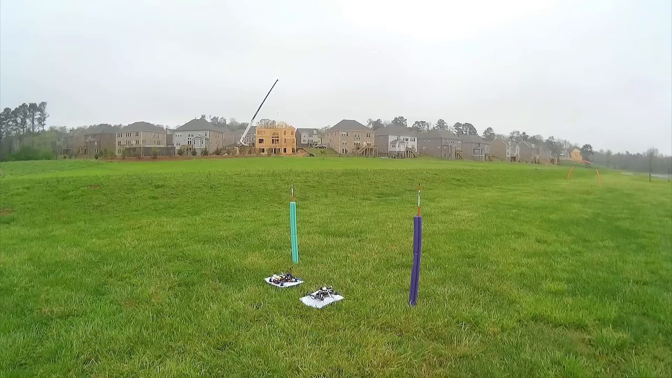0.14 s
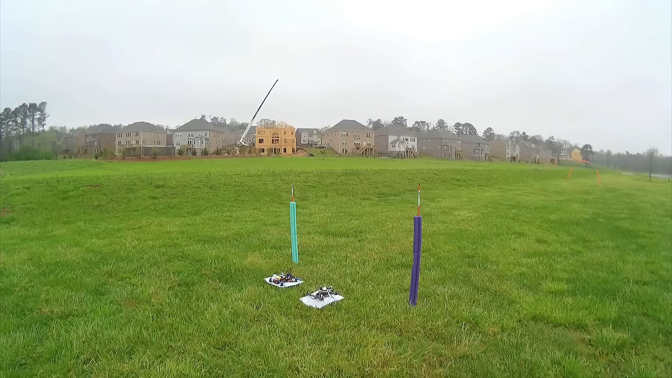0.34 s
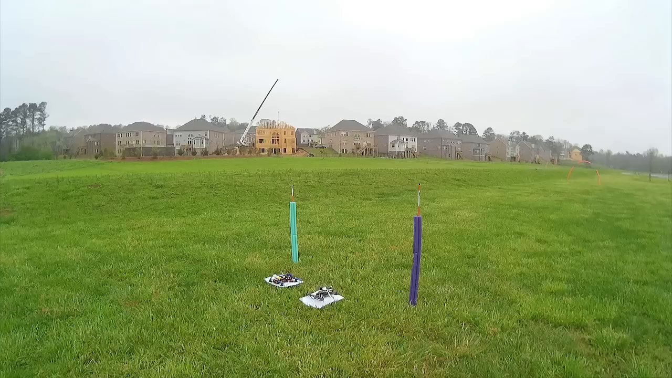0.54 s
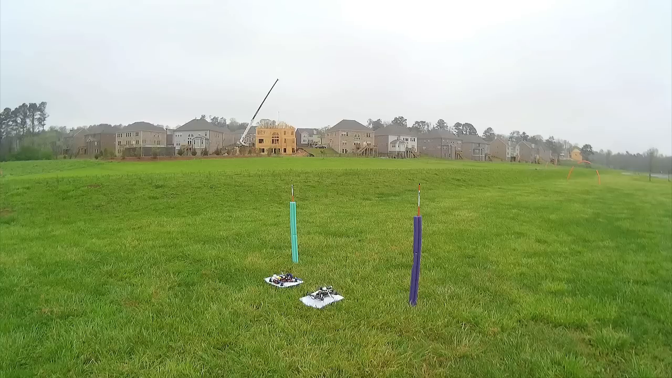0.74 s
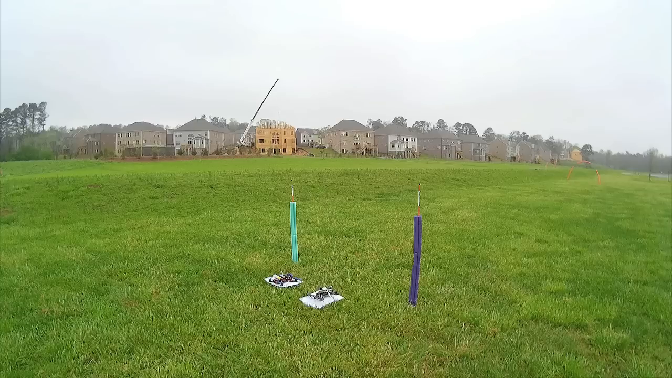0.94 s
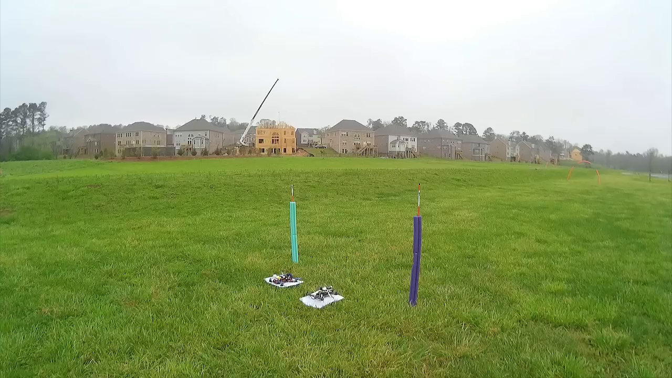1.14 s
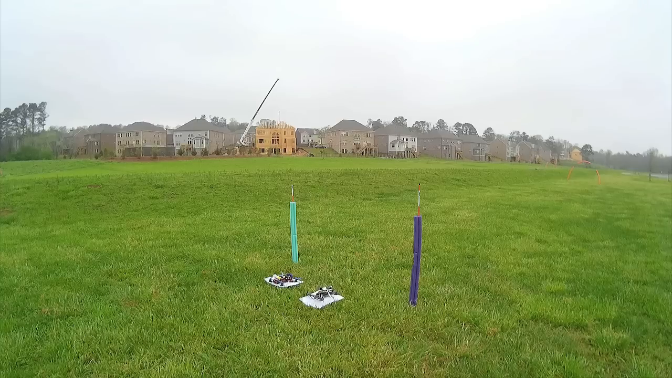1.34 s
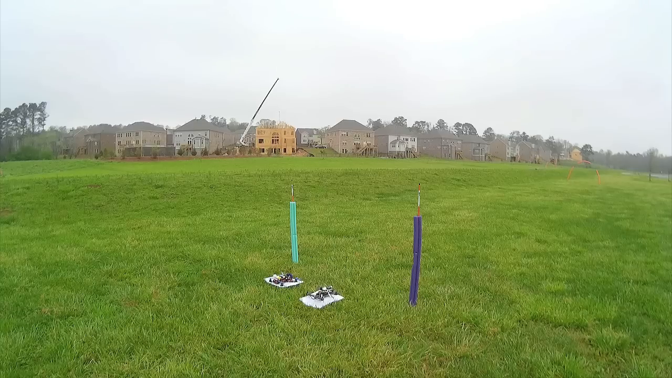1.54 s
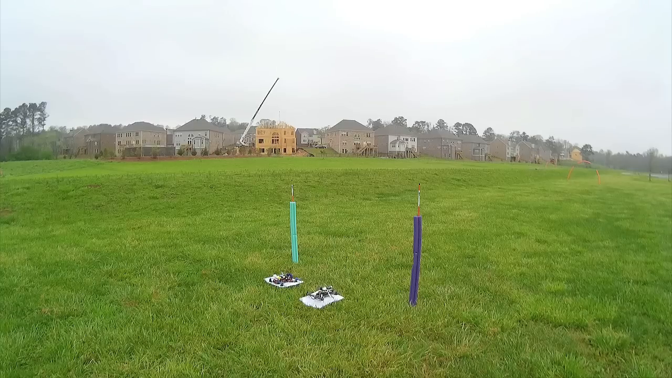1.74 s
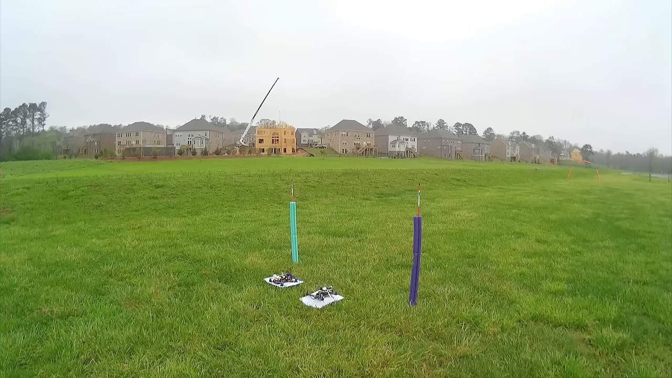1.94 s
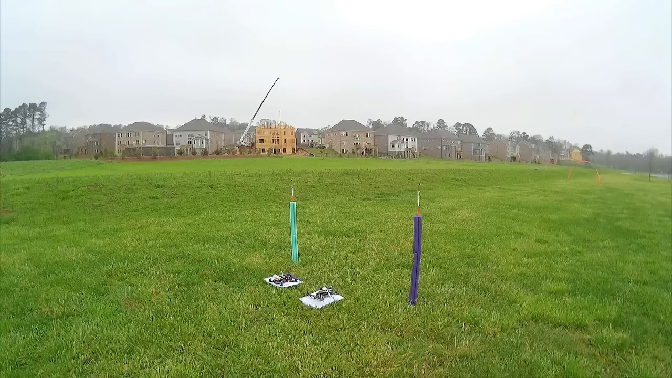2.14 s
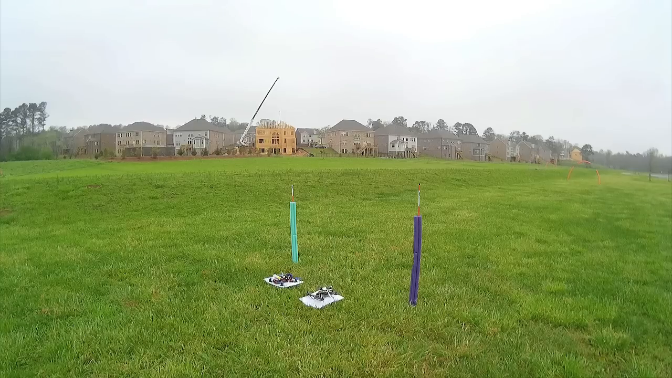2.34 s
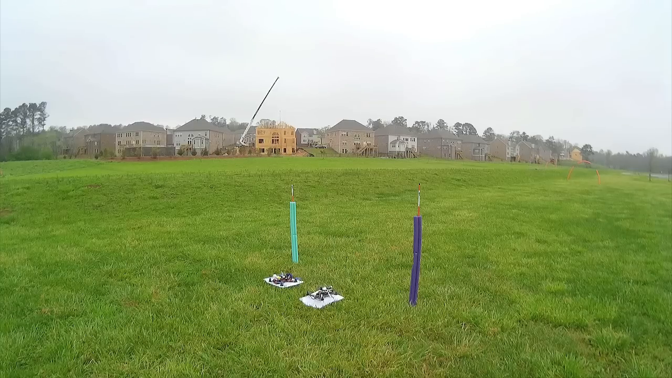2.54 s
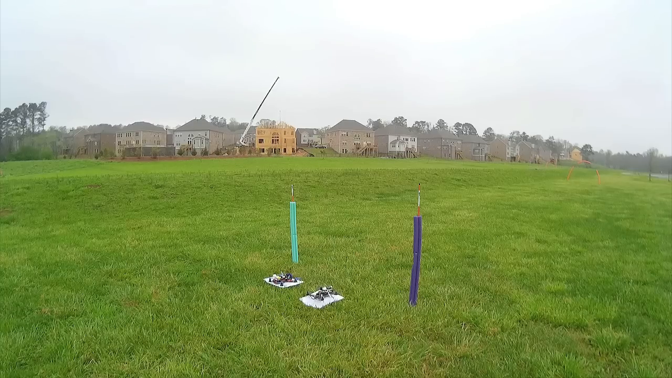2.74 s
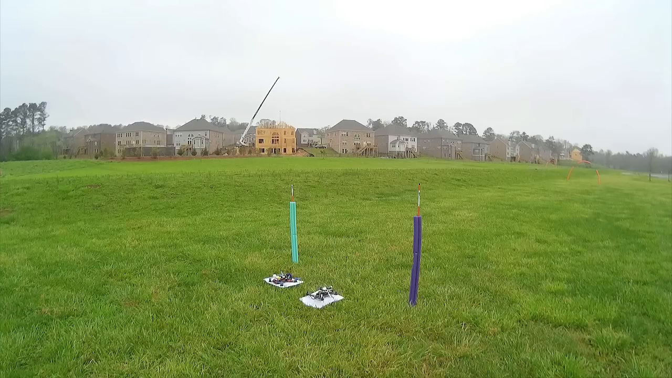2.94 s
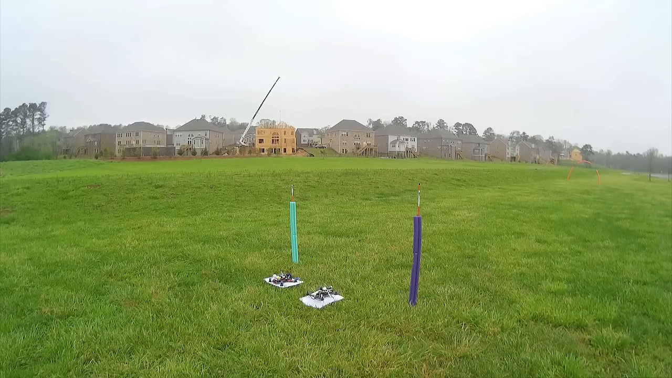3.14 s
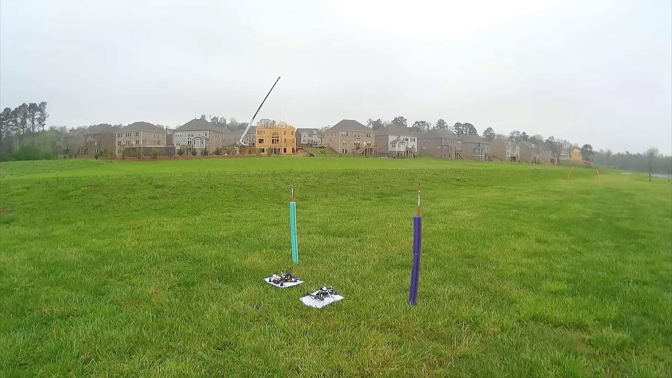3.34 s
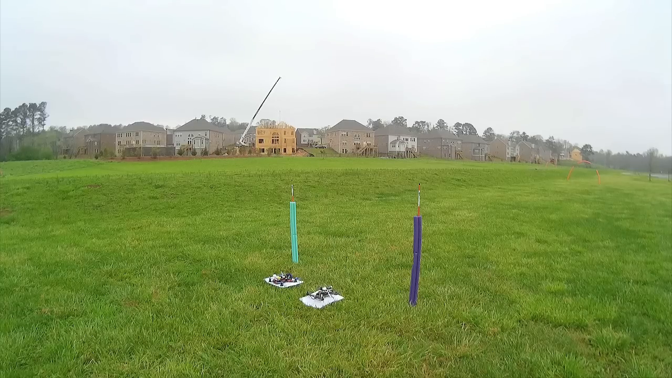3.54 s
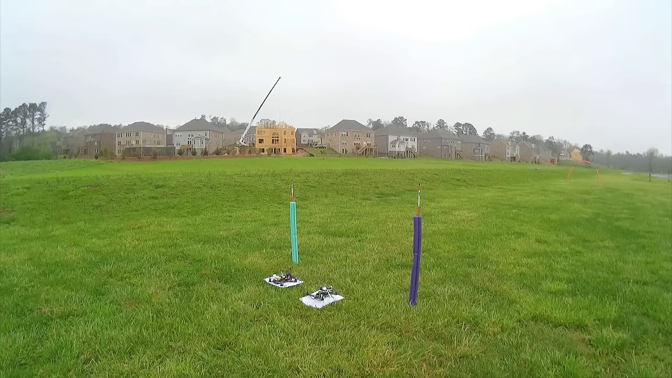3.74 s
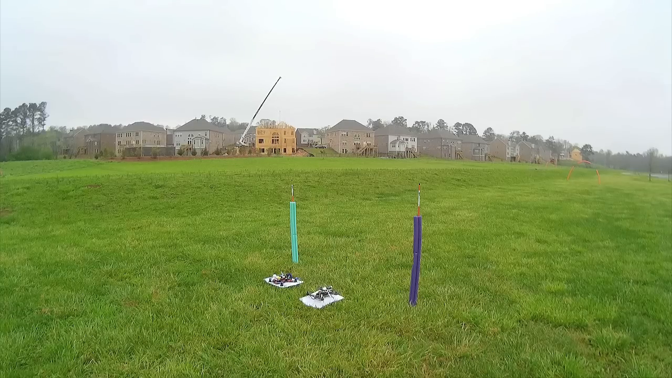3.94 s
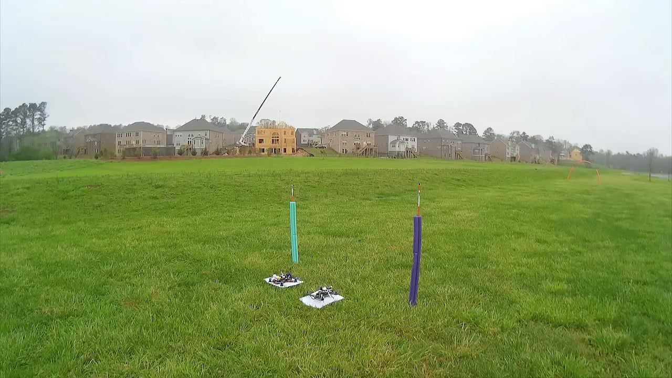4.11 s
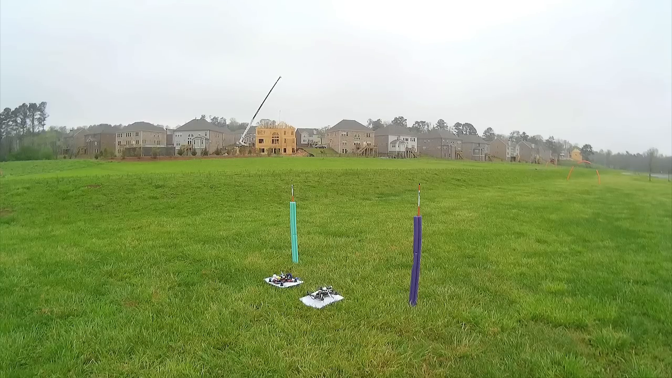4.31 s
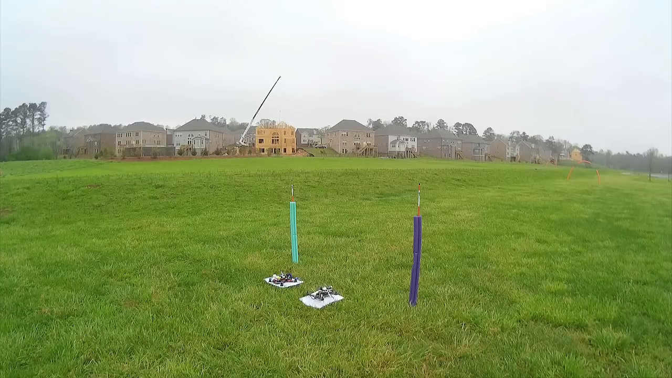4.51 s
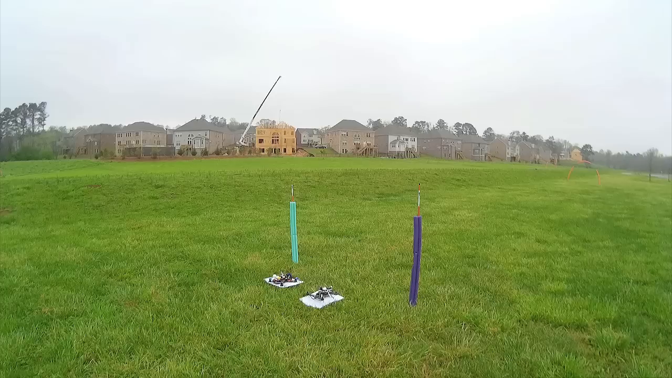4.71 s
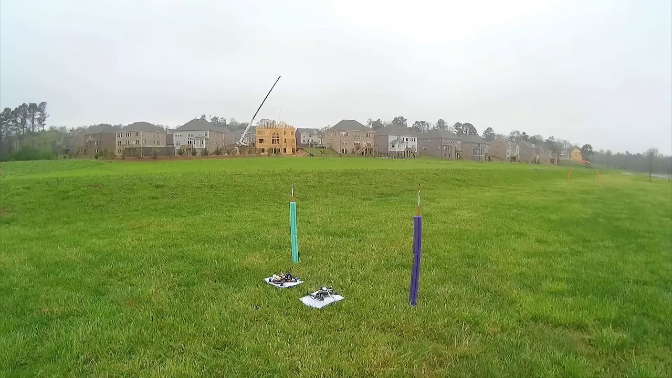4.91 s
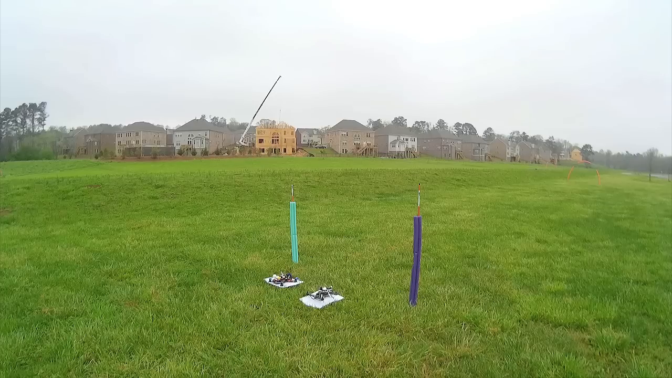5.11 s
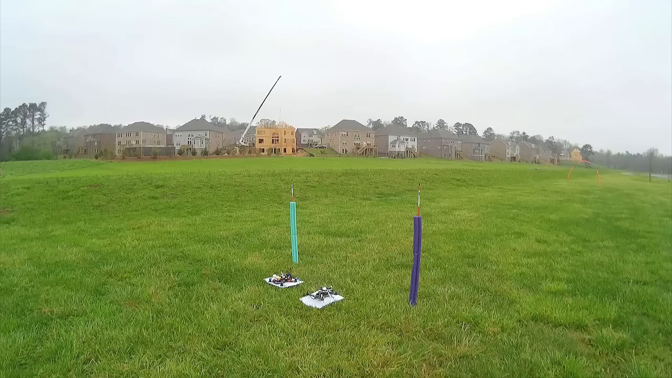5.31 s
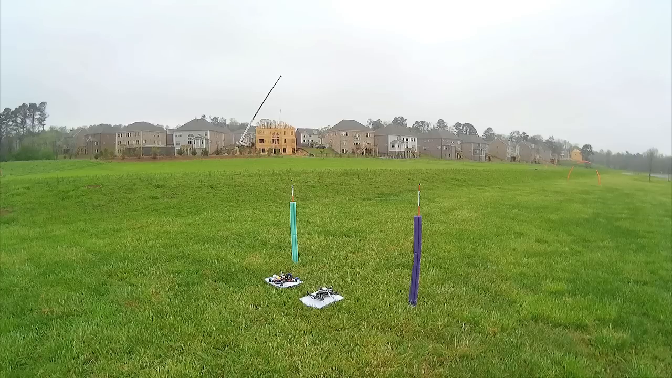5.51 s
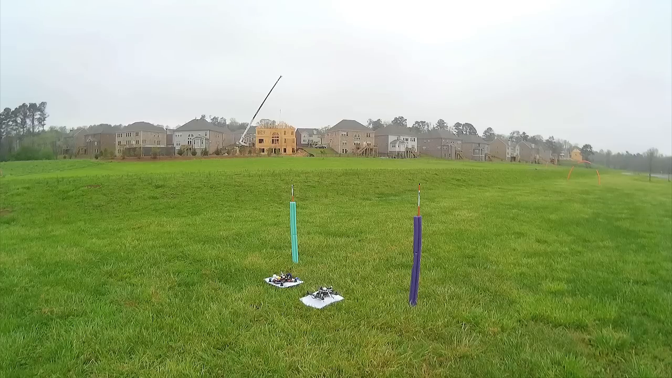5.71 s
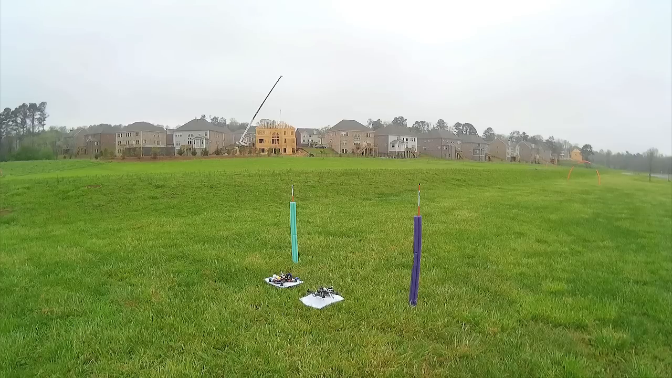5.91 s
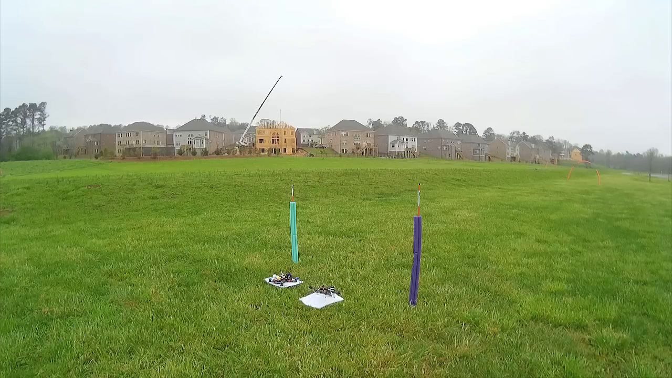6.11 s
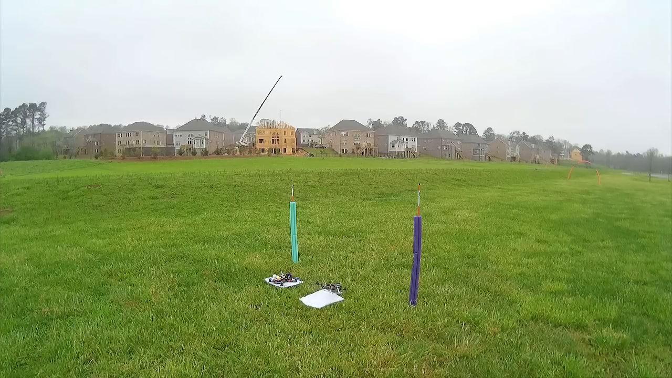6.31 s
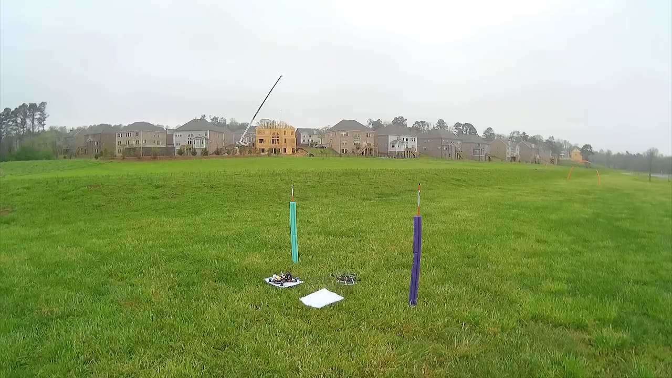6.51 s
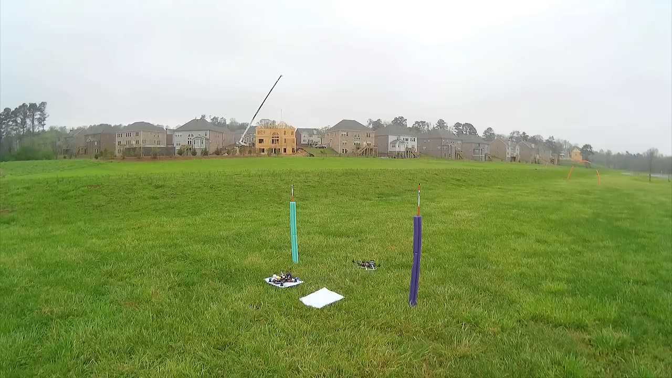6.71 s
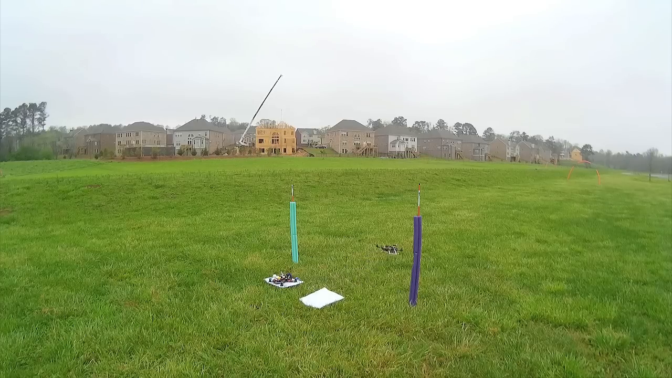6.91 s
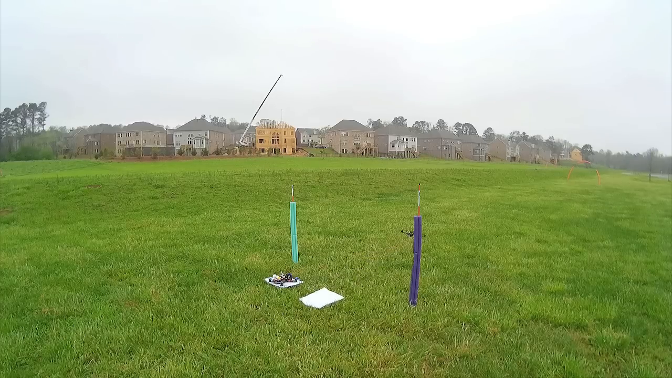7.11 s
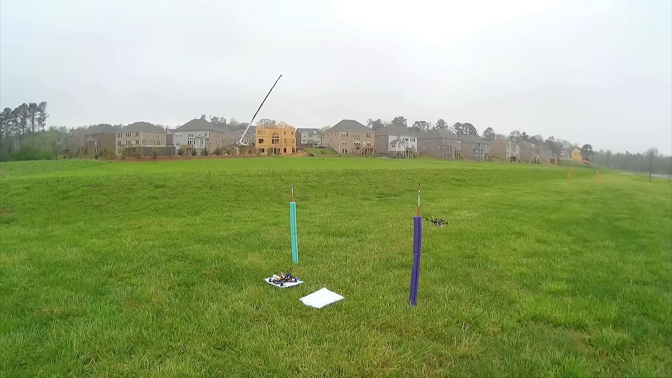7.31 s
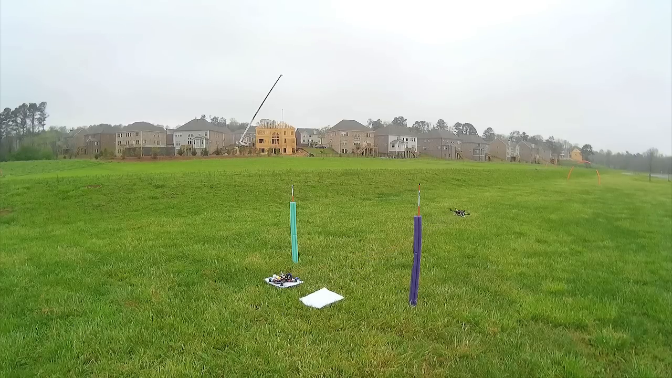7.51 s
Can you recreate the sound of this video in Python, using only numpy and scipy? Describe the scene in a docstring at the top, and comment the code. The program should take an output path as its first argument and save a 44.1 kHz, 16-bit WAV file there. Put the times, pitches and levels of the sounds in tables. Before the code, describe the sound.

Open grassy park, a fixed microphone a little way off. Two distant engines hum low and beat slowly over soft murmur. A plastic tick comes early, then thin motor-controller buzzes and a short duller quadcopter rev. Small bird chirps repeat evenly. Finally a racing drone spins up sharply, roars in rough surges with a high whine, lifts off its pad and gets thinner as it flies away.

```python
"""Two distant engines hum and beat over the murmur of a park, with a faint whistle from camera electronics;
all are tone stacks or shaped noise, and this background swells and sinks slowly. A plastic tick rings early on.
Motor controllers buzz as motors kick, then a small racing quadcopter revs briefly: blade tones and torn air.
A bird chirps, falling sine blips. Then a quadcopter spins up, magnets whining, lifts off its pad and flies away:
four rotors sing and roar with brief surges, and the echo off the ground fades out."""
import sys
import numpy as np
from scipy import signal
from scipy.fft import rfft, irfft, next_fast_len
from scipy.io import wavfile
from scipy.ndimage import uniform_filter1d

SR = 44100
rng = np.random.default_rng(int(sys.argv[2]) if len(sys.argv) > 2 else 0)


def bounce(signal):
    """Save signal as a 16-bit WAV file at the path given by the first command-line argument."""
    frames = np.transpose(np.atleast_2d(signal))
    limited = np.clip(frames, -1, 1)
    pcm = np.round(limited * 32767).astype(np.int16)
    wavfile.write(sys.argv[1], SR, pcm)


N = 332955
T = np.arange(N) / SR  # time in seconds

# Near engine speed before hunting. Each row: time in seconds, firing rate in Hz.
NEAR_SPEED = [(0, 76.7), (1.3, 76.4), (1.9, 76.2), (2.7, 78), (3.5, 78.3), (4.5, 78.05), (5.1, 77.93),
              (7, 77.45), (7.55, 77.3)]
# Near engine balance. Each row: time in seconds, fifth order in dB re hum, fan in dB re hum.
NEAR_BALANCE = [(0, -11.5, -20.5), (1.8, -8.5, -23), (2.6, -12, -15), (3.1, -20, -17.5), (4.5, -23.5, -16),
                (5.1, -13, -14), (5.7, -31, -18.5), (6.3, -11.5, -25), (7.55, -15, -19.5)]
# Near engine hum. Each row: multiple of the firing rate, level in dB re hum.
HUM_ORDERS = [(1, 0), (2, -7.5), (3, -22.5), (1.5, -23), (3.47, -21.5)]
# Near engine fan. Each row: multiple of the firing rate, level in dB re fan.
FAN_ORDERS = [(10, 1.5), (10.39, -1), (12.5, -4), (14, -5.5), (16.65, 3.5), (16.8, -2)]
# Far engine. Each row: time in seconds, firing rate in Hz, level in dB re hum, third order in dB re hum.
FAR_ENGINE = [(0, 73.5, -8.5, -26), (1.8, 73.4, -12.5, -12.5), (3.5, 74.06, -7, -30),
              (4.8, 74.33, -4.5, -26), (5.2, 74.4, -6, -14), (6, 74.43, -15.5, -13), (7, 74.75, -14.5, -13),
              (7.55, 74.9, -13, -17)]
# Far engine tones. Each row: multiple of the firing rate, level in dB re far engine.
FAR_ORDERS = [(1, -17), (2, 0.5)]
# Background level, which sets the hum and the field. Each row: time in seconds, level in dB.
BACKGROUND = [(0, -30), (.3, -35), (.9, -33.5), (1.75, -34.5), (2.1, -28), (2.4, -24), (2.9, -25.5),
              (3.6, -32), (3.9, -29.5), (4.2, -28.5), (4.55, -23), (5.4, -23.5), (6.0, -21.5), (6.6, -21),
              (7.55, -20.5)]
# Park murmur spectrum. Each row: frequency in Hz, relative level in dB per Hz.
MURMUR_SPECTRUM = [(15, -43), (25, -16), (53, -9.5), (82, -6.5), (119, -8.5), (164, -6), (273, -18),
                   (398, -16), (494, -19.5), (1300, -14), (1890, -27.5), (2110, -21.5), (3810, -34),
                   (8760, -36.5), (15400, -37)]
DRONE_HZ, DRONE_DB = 42.7, -15.5  # a low tone, dB re the field
# Camera electronics. Each row: frequency in Hz, level in dB re the field.
CAMERA_WHISTLE = [(8493.7, -36), (8559.7, -43), (8625.8, -34), (8658.8, -33), (8691.9, -31.5),
                  (8824.1, -36)]

# Plastic tick. Each row: start in seconds, level in dB before its parts are summed.
TICKS = [(.3433, -18)]
# Ringing of the plastic. Each row: frequency in Hz, level in dB re the tick, 60 dB decay time in seconds.
TICK_MODES = [(1120, 0, 0.035), (1400, -1, .015), (2600, -3, .012), (4300, -12, 0.007), (5800, -10, .008)]

# Motor kicks. Each row: start in seconds, length in seconds, level in dB, sideband spread in Hz per second.
MOTOR_KICKS = [(.862, .035, -50, -3), (.905, 0.1, -43, 4500), (1.758, .065, -48, 9000),
               (1.858, 0.12, -42.5, 2500), (1.97, .15, -52, 0)]
SWITCH_HZ = 9110  # motor controller switching

# Lift-off. Each row: time in seconds, height from 0 on the pad to 1 flying.
HEIGHT = [(6.45, 0.0056), (6.75, 0.92), (7.1, 0.97)]
# Throttle surges. Each row: centre in seconds, half length in seconds, rise in dB.
SURGES = [(5.724, 0.024, 2.5), (5.894, .04, 4), (6.1, 0.041, 3), (6.274, 0.044, 3), (6.54, 0.049, 2.5),
          (6.82, 0.059, 1.5)]
TONE_SURGE, HISS_SURGE = 1.0, 1.1  # dB per dB of surge in the roar
# Air torn by the blades in the rev. Each row: time in seconds, roar in dB before flutter.
REV_ROAR = [(1.75, -53), (1.9, -44), (2.1, -37), (2.25, -29), (2.62, -24.5), (2.7, -27), (2.8, -39.5),
            (3.0, -46)]
# Air torn by the blades at lift-off. Each row: time in seconds, roar in dB before surges and flutter.
LAUNCH_ROAR = [(5.3, -45), (5.62, -29), (5.72, -23.5), (5.96, -21), (6.19, -23.5), (6.42, -20.5),
               (6.62, -23.5), (6.85, -28), (7.2, -28.5), (7.55, -29.5)]
REV_HISS_DB, LAUNCH_HISS_DB = -34, -26  # hiss when the roar is at its mark
REV_MARK_DB, LAUNCH_MARK_DB = -28, -23
REV_HISS_GROWS, LAUNCH_HISS_GROWS = 0.63, 0.95  # dB of hiss per dB of roar
# Roar of the slower, duller rev. Each row: frequency in Hz, relative level in dB per Hz.
REV_SPECTRUM = [(120, -32), (200, -16), (286, -22), (388, -3), (554, -16.5), (1190, -7.5), (2490, -17.5),
                (4200, -28), (5460, -58), (9240, -120)]
# Roar at lift-off. Each row: frequency in Hz, relative level in dB per Hz.
LAUNCH_SPECTRUM = [(120, -28), (200, -9), (355, -8.5), (646, -2), (706, -9), (1240, 2), (1840, -8),
                   (3750, -8.5), (4200, -15.5), (5460, -46), (9240, -120)]
# Hiss on the pad, notched by the echo off the ground. Each row: frequency in Hz, relative level in dB per Hz.
PAD_HISS = [(2240, -13), (3800, -6), (4370, -52), (4830, -14), (5460, -6), (6360, -12.5), (7070, -0.5),
            (7410, -3), (8090, -14.5), (8830, -2.5), (10300, -12.5), (12200, -1), (13500, -12),
            (14900, -3.5), (15400, -8.5)]
# Hiss in flight. Each row: frequency in Hz, relative level in dB per Hz.
AIR_HISS = [(2240, -34), (3800, -6), (5660, -12.5), (7070, -8), (7810, -8), (11600, -3), (13000, -15),
            (15400, -2)]

# Rotors, one list each: two rev, four lift off.
# Each row: time in seconds, blade-pass rate in Hz before hunting, first order in dB before surges.
ROTORS = [
    [(1.85, 274.4, -48), (2.1, 314, -44), (2.3, 346.4, -39.5), (2.63, 361, -34), (2.7, 345, -38),
     (2.82, 247, -44)],
    [(1.85, 229.4, -48.5), (2.1, 272, -40.5), (2.27, 383.6, -35), (2.4, 386.4, -32), (2.66, 400, -33.5),
     (2.73, 337.6, -36.5), (2.82, 243, -51)],
    [(5.4, 292.8, -49), (5.63, 417, -40), (5.72, 445, -33), (5.93, 479.7, -31), (6.1, 603.4, -29.5),
     (6.18, 650.7, -32), (6.37, 659.7, -32.5), (6.58, 636, -27), (6.7, 608, -31.5), (7.0, 598, -34.5),
     (7.55, 579, -35.5)],
    [(5.5, 357.8, -62), (5.65, 432.6, -34), (5.85, 492.1, -31.5), (5.97, 520.5, -32.5), (6.2, 590, -38),
     (6.28, 563, -34), (6.47, 598, -28.5), (6.6, 619.5, -30.5), (6.7, 598.8, -34), (6.82, 590, -32.5),
     (7.55, 575.1, -39.5)],
    [(5.5, 345, -59), (5.62, 407, -39), (5.9, 472, -31), (6.1, 434.2, -32.5), (6.22, 430, -33.5),
     (6.28, 477.6, -33.5), (6.55, 534.5, -37.5), (6.82, 493, -40.5), (7.0, 492, -44), (7.25, 507, -39),
     (7.55, 503.5, -41)],
    [(6.15, 479, -37), (6.5, 539, -35.5), (6.62, 533, -34), (6.75, 507.9, -39), (6.95, 513, -53),
     (7.1, 527.7, -39), (7.55, 516, -41)],
]
# Each entry: 1 for a slow rotor, 0 for a fast one, in the order of the rotors.
IS_SLOW = [1, 0, 0, 0, 1, 1]
# Tones that follow the first order; three blades put the shaft at a third.
# Each row: multiple of the blade-pass rate, level in dB re first order.
WITH_FIRST = [(1 / 3, -6), (0.99, 0)]
# Tones that follow the second order. Each row: multiple of the blade-pass rate, level in dB re that group.
WITH_SECOND = [(2, 0), (7 / 3, -19.5), (3, -7.5)]
# Fourth order. Each row: multiple of the blade-pass rate, level in dB re its bite.
FOURTH_ORDER = [(4, 1.5)]
# Highest orders. Each row: multiple of the blade-pass rate, level in dB re their bite.
UPPER_ORDERS = [(5, -5), (6, -6.5)]
# Second order balance. Each row: time in seconds, dB re first on fast rotors, dB re first on slow rotors.
OCTAVE = [(2.15, 3.5, 3.1), (2.35, -2, 2.8), (2.7, -3, 3.3), (5.7, 9, 6), (5.95, 5, 3), (6.2, -7, 6.1),
          (6.4, -2, 8), (6.52, 8, 2.98), (7.0, 8, 8.7), (7.55, 8, 8)]
# Bite of the blades. Each row: time in seconds, fourth order in dB re first, higher orders in dB re first.
BITE = [(2, -12, -5), (5.85, -6, -8), (6.05, -2.5, -7), (6.4, -11, 1.5), (6.57, 2, -2.5), (6.85, 1.5, 0.5),
        (7.55, -5, -9)]
# Churned air at the blades. Each row: time in seconds, amount from 0 to 1.
STIRRED = [(3, .4), (5.3, 1), (5.95, 1), (6.15, .7), (6.6, .65), (6.85, .2)]
SLOW_BITE_DB = -6  # the slow rotors bite less
FRAY_DB = 2  # extra flutter of the highest orders

# Bird. Each row: start in seconds, level in dB.
BIRD_CHIRPS = [(2.95, -45), (3.213, -48), (3.457, -49), (3.693, -48), (3.935, -50), (4.17, -52),
               (4.403, -47)]
# Motor magnets, from the pad into flight. Each row: time in seconds, pitch in Hz before its wobble, level in dB.
MAGNET_WHINE = [(5.92, 6020, -46), (6.1, 6750, -41), (6.3, 7150, -39), (6.55, 7250, -39), (6.8, 7050, -47),
                (7.03, 7090, -47), (7.4, 6800, -45), (7.55, 6810, -44)]
TOP_HZ = 15350  # band limit


def amp(db):
    """Gain from dB."""
    return 10 ** (np.asarray(db) / 20)


def unit(x):
    """x scaled to rms 1."""
    return x / np.sqrt(np.mean(x ** 2) + 1e-20)


def curves(rows):
    """One value per sample for each column after the time."""
    s, *columns = np.transpose(rows)
    return [np.interp(T, s, column) for column in columns]


def gate(start, stop, fade):
    """1 between two times, with soft edges."""
    return np.clip(np.minimum(T - start, stop - T) / fade, 0, 1)


def wobble(rate):
    """A random curve, rate knots a second."""
    knots = rng.standard_normal(int(N * rate / SR) + 4)
    return np.interp(T * rate, np.arange(len(knots)), knots)


def filtered(x, response):
    """x times a response of frequency."""
    m = next_fast_len(N + 8192)
    spectrum = rfft(x, m) * response(np.fft.rfftfreq(m, 1 / SR))
    return irfft(spectrum, m)[..., :N]


def coloured(x, spectrum):
    """x shaped by (Hz, dB) points on a log axis, rms 1."""
    f, db = np.transpose(spectrum)
    return unit(filtered(x, lambda hz: amp(np.interp(np.log(hz + 1), np.log(f + 1), db))))


def patchy(depth_db):
    """White noise with patches of random gain over time and frequency."""
    z = signal.stft(rng.standard_normal(N + 512), nperseg=512)[2]
    patches = uniform_filter1d(rng.standard_normal(z.shape), 6, axis=0)
    patches = uniform_filter1d(patches, 10, axis=1)
    return signal.istft(z * amp(depth_db * unit(patches)), nperseg=512)[1][:N]


def orders(turns, table, flutter_db, rate):
    """Sines at multiples of a rotation, rms 1 at 0 dB, each fluttering alone."""
    total = np.zeros(N)
    for multiple, db in table:
        level = np.sqrt(2) * amp(db + flutter_db * wobble(rate))
        total += level * np.sin(2 * np.pi * (multiple * turns + rng.random()))
    return total


def engines():
    """Two engines a few Hz apart: their second orders beat."""
    fifth_db, fan_db = curves(NEAR_BALANCE)
    hum_db = curves(BACKGROUND)[0]
    hunting = 0.00091 * wobble(9)
    turns = np.cumsum(curves(NEAR_SPEED)[0] * (1 + hunting)) / SR
    near = amp(hum_db) * orders(turns, HUM_ORDERS, flutter_db=1.7, rate=7)
    near += amp(hum_db + fifth_db) * orders(turns, [(5, 0)], flutter_db=0.3, rate=14)
    near += amp(hum_db + fan_db) * orders(turns, FAN_ORDERS, flutter_db=1.5, rate=14)
    far_hz, far_db, third_db = curves(FAR_ENGINE)
    turns = np.cumsum(far_hz) / SR
    far = amp(far_db) * orders(turns, FAR_ORDERS, flutter_db=0.1, rate=2.6)
    far += amp(third_db) * orders(turns, [(3, 0)], flutter_db=3.0, rate=6)
    return near + amp(hum_db) * far


def field():
    """Murmur of the park as shaped patchy noise, with thin tones at fixed pitches."""
    stir_db = 1.0 * wobble(7)
    murmur = amp(-2.5 + stir_db) * coloured(patchy(depth_db=0.7), MURMUR_SPECTRUM)
    tones = orders(T, CAMERA_WHISTLE + [(DRONE_HZ, DRONE_DB)], flutter_db=0.5, rate=3.0)
    level_db = uniform_filter1d(curves(BACKGROUND)[0], size=SR // 4)
    return amp(level_db) * (murmur + tones)


def plastic_tick():
    """Struck plastic: a few fast-dying modes and a dry crack of noise."""
    out, t = np.zeros(N + SR), np.arange(SR // 20) / SR
    for s, db in TICKS:
        ring = sum(amp(level - 60 * t / t60) * np.sin(2 * np.pi * hz * t) for hz, level, t60 in TICK_MODES)
        crack = amp(-4 - 60 * t / .012) * uniform_filter1d(rng.standard_normal(len(t)), size=5)
        attack = 1 - np.exp(-t / .0008)
        out[round(s * SR):][:len(t)] += amp(db) * (ring + crack) * attack
    return out[:N]


def motor_switching():
    """Controller switching tone, its sidebands parting at the spread given for each motor kick."""
    out = np.zeros(N)
    for s, length, level_db, spread in MOTOR_KICKS:
        beat = 1 + .8 * np.cos(np.pi * spread * (T - s) ** 2)
        on = gate(s, s + length, fade=.006)
        out += on * amp(level_db) * beat * np.sin(2 * np.pi * SWITCH_HZ * T)
    return out


def surge():
    """Throttle surges as brief rises in level, dB."""
    return sum(db * np.exp(-((T - s) / half) ** 2) for s, half, db in SURGES)


def wash(passing):
    """Turbulence pulsed by the blades; the ground notches vanish with height."""
    rev_db, launch_db, surge_db = curves(REV_ROAR)[0], curves(LAUNCH_ROAR)[0], surge()
    height = curves(HEIGHT)[0]
    rev, launch = gate(1.7, 3.05, fade=0.094), gate(5.25, 8, fade=0.059)
    # the pulsing is levelled so that it leaves the loudness alone
    pulse = amp(1.4 * passing) / np.sqrt(uniform_filter1d(amp(2.8 * passing), size=SR // 20))
    air = patchy(depth_db=1.1) * pulse
    hiss = np.sqrt(1 - height) * coloured(air, PAD_HISS) + np.sqrt(height) * coloured(air, AIR_HISS)
    roar = rev * amp(rev_db) * coloured(air, REV_SPECTRUM)
    roar += launch * amp(launch_db + surge_db) * coloured(air, LAUNCH_SPECTRUM)
    rev_hiss_db = REV_HISS_DB + REV_HISS_GROWS * (rev_db - REV_MARK_DB)
    launch_hiss_db = LAUNCH_HISS_DB + LAUNCH_HISS_GROWS * (launch_db - LAUNCH_MARK_DB)
    launch_hiss_db += HISS_SURGE * surge_db
    hiss_gain = rev * amp(rev_hiss_db) + launch * amp(launch_hiss_db)
    return amp(1.25 * wobble(30)) * (roar + hiss_gain * hiss)


def rotors():
    """Blade tones of each rotor, and the pulse of blades passing."""
    tones, passing = np.zeros(N), np.zeros(N)
    stirred = curves(STIRRED)[0]  # at full power near the ground the blades cut their own churned air
    flutter_db = 1.3 + 3.7 * stirred
    fourth_db, upper_db = curves(BITE)
    swell = amp(TONE_SURGE * surge())
    for rows, slow in zip(ROTORS, IS_SLOW):
        octave_db = curves(OCTAVE)[slow]
        bite_db = slow * SLOW_BITE_DB
        hz, first_db = curves(rows)
        hunting = (.004 + .022 * stirred) * wobble(40)
        turns = np.cumsum(hz * (1 + hunting)) / SR
        on = gate(rows[0][0], rows[-1][0] + 0.021, fade=0.02)
        stack = orders(turns, WITH_FIRST, flutter_db, rate=45)
        stack += amp(octave_db) * orders(turns, WITH_SECOND, flutter_db, rate=55)
        stack += amp(fourth_db + bite_db) * orders(turns, FOURTH_ORDER, flutter_db, rate=70)
        stack += amp(upper_db + bite_db) * orders(turns, UPPER_ORDERS, flutter_db + FRAY_DB, rate=25)
        tones += on * swell * amp(first_db) * stack
        passing += on * np.cos(2 * np.pi * turns)
    height = curves(HEIGHT)[0]
    # the echo off the ground thins one band around 1930 Hz
    echoed = filtered(tones, lambda f: 1 - .7 * np.exp(-((f - 1930) / 260) ** 2))
    return height * tones + (1 - height) * echoed, passing


def bird():
    """Short sine chirps falling in pitch under a smooth swell."""
    out, t = np.zeros(N + SR), np.arange(SR // 20) / SR
    for s, db in BIRD_CHIRPS:
        falling = np.sin(2 * np.pi * (4200 * t - 7500 * t ** 2))  # from 4200 Hz, 15 Hz lower each ms
        out[round(s * SR):][:len(t)] += amp(db) * falling * np.sin(np.pi * t / t[-1]) ** 2
    return out[:N]


def magnet_whine():
    """Motor magnets whine from the launch run-up on into flight: one tone, unsteady in pitch and level."""
    hz, db = curves(MAGNET_WHINE)
    turns = np.cumsum(hz * (1 + 0.00294 * wobble(40))) / SR
    on = gate(MAGNET_WHINE[0][0], 8, fade=0.08)
    return on * amp(db) * orders(turns, [(1, 0)], flutter_db=3.5, rate=27)


def scene():
    """All the layers summed to one channel."""
    tones, passing = rotors()
    background = engines() + field()
    quadcopters = motor_switching() + wash(passing) + tones + magnet_whine()
    return (background + plastic_tick() + quadcopters + bird())[None]


def record(dry):
    """The input rounds off the highest peaks and keeps nothing above its band limit."""
    rounded = dry / (1 + np.abs(dry / .98) ** 6) ** (1 / 6)
    return filtered(rounded, lambda hz: hz < TOP_HZ)


dry = scene()
out = record(dry)
bounce(out)
```